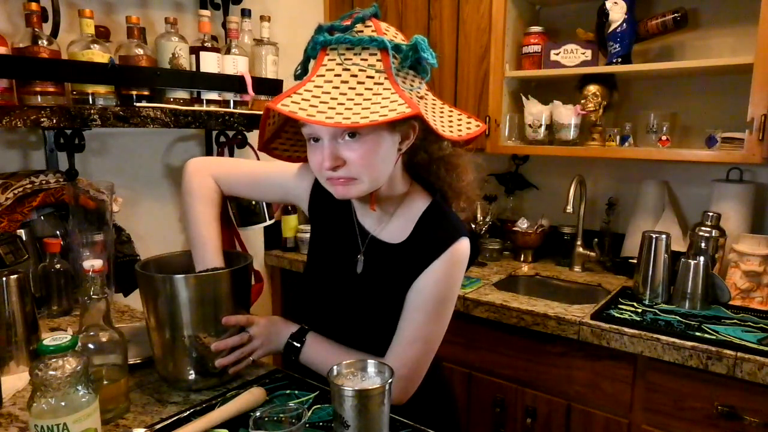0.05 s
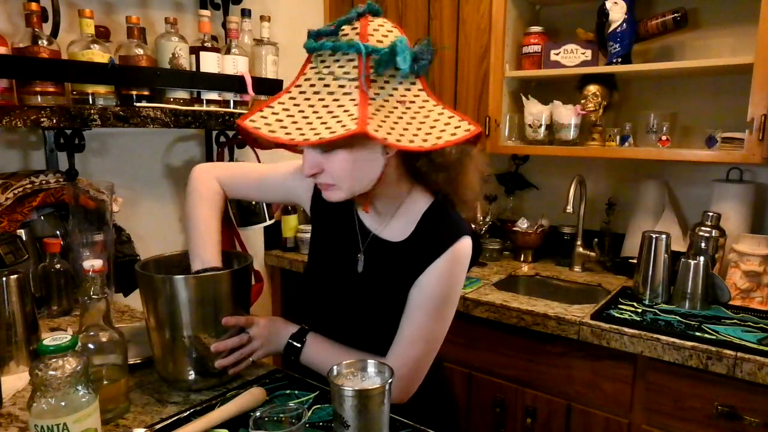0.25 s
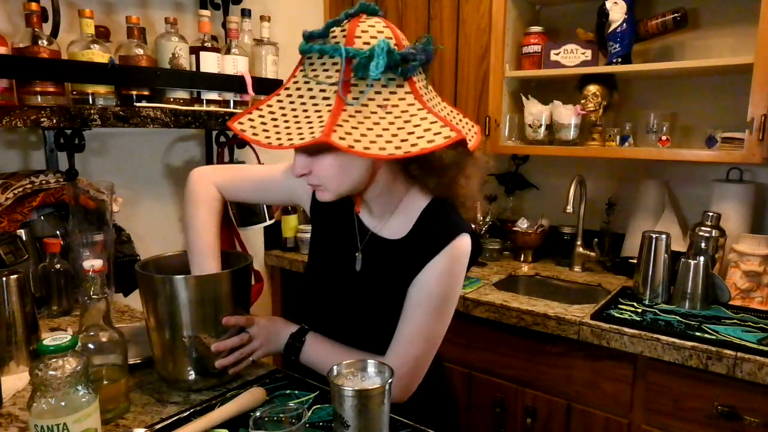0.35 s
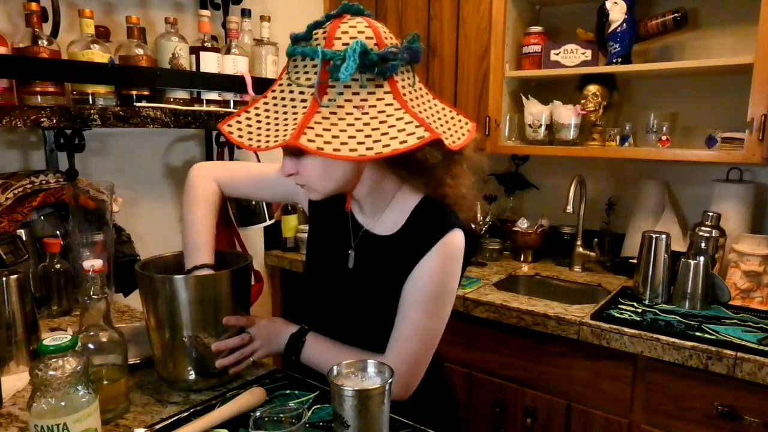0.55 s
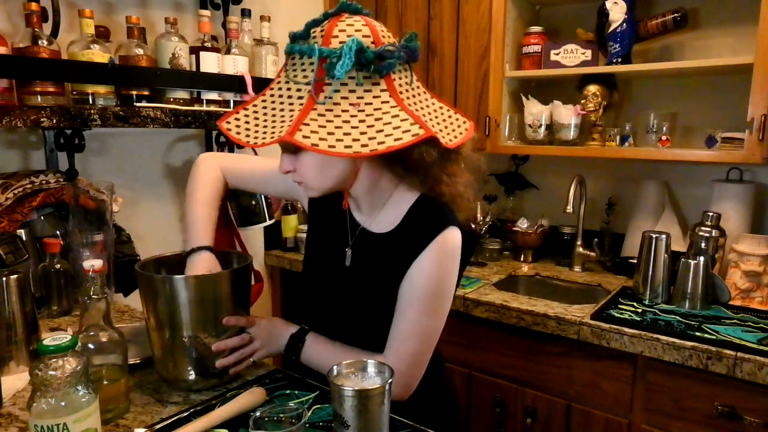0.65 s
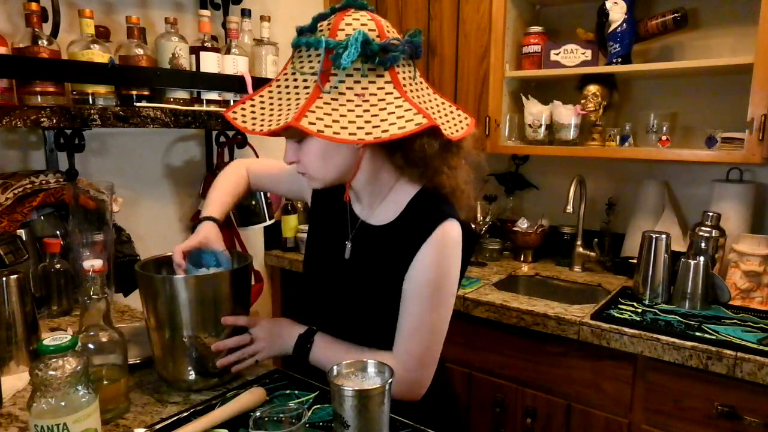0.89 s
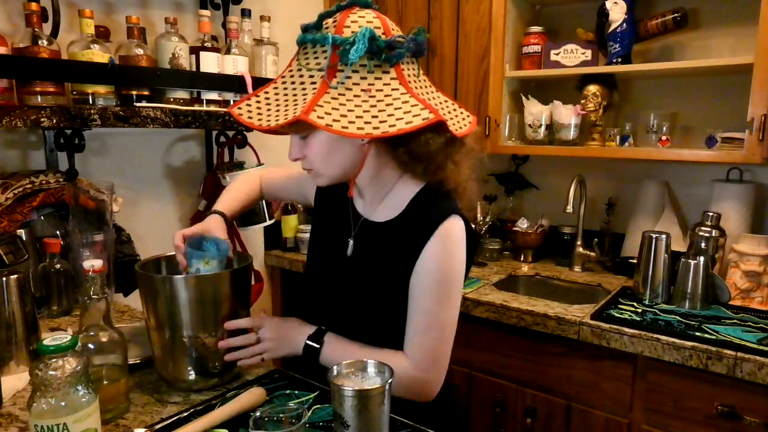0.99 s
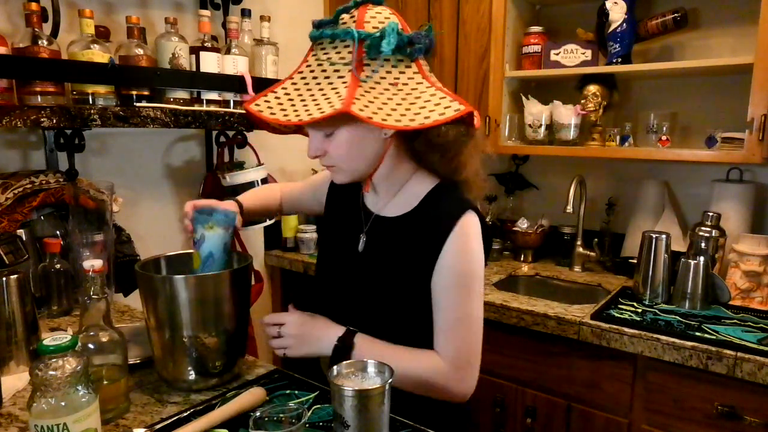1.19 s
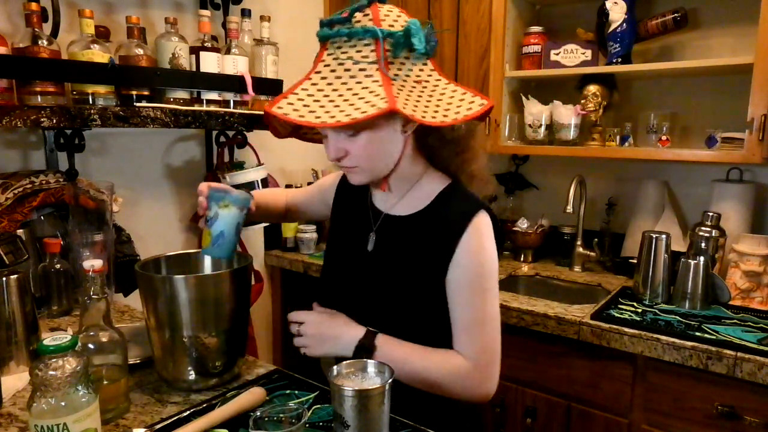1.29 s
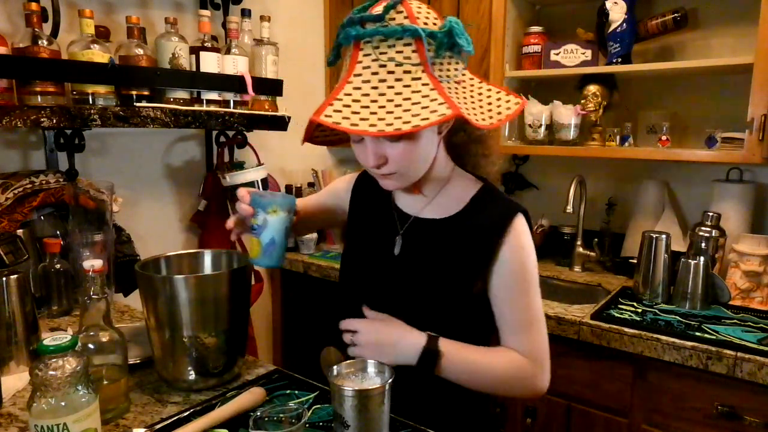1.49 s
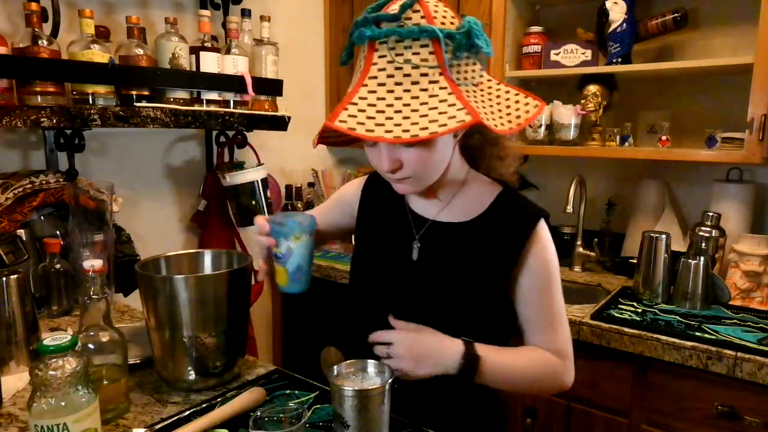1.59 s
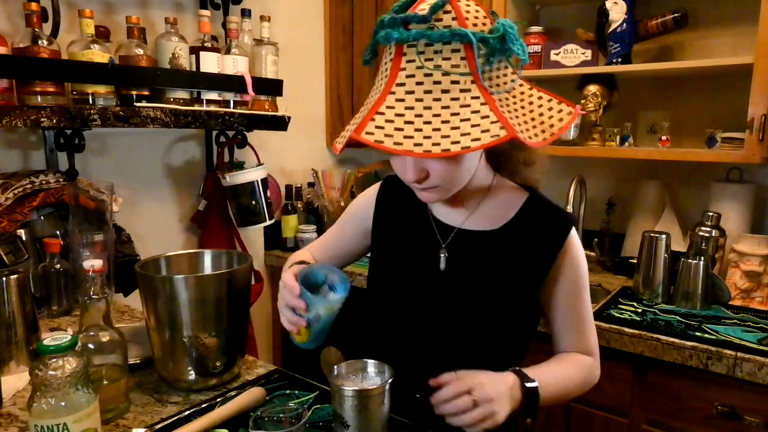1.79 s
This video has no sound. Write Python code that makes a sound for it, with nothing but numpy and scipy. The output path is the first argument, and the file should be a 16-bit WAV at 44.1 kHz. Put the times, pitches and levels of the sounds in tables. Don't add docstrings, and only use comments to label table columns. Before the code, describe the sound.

Ice scoop in a metal bucket, close and mono. Faint touches and a small bite before 0.15 s, then a pause. At about 0.22 s the cup plunges in, crunching with cracks and a strong hollow thud near 0.3; hard shoves continue to 0.65. A short scrape up the wall around 0.7, loose lumps clatter at 0.87-1.1, then quiet kitchen air, low hum and a faint late rustle near 1.6.

```python
import sys
import numpy as np
from scipy import signal
from scipy.fft import rfft, irfft, next_fast_len
from scipy.io import wavfile
from scipy.ndimage import uniform_filter1d

SR = 44100
rng = np.random.default_rng(int(sys.argv[2]) if len(sys.argv) > 2 else 0)


def ratio_of_db(decibels):
    return 10 ** (np.asarray(decibels, float) / 20)


def master_out(mix):
    frames = np.transpose(np.atleast_2d(mix))
    ceiling = np.clip(frames, -1, 1)
    pcm = np.round(ceiling * 32767).astype(np.int16)
    wavfile.write(sys.argv[1], SR, pcm)


N = 81585
T = np.arange(N) / SR

# (frequency [Hz], level [dB])
HUM = [(59.2, -80), (118.4, -83), (177.6, -76.5), (301.5, -87)]
# (frequency [Hz], density [dB per Hz])
AIR = [(25, -43), (55, -11), (129, -12), (180, 2), (222, -5), (303, -1), (1380, -7.5), (4000, -8.5),
       (15800, -18.5)]

# (time [s], effort [dB], cavity share [dB], high when the cup is deep)
TOUCH = [
    (0.0, -56, 21.5),
    (0.004, -52, -5),
    (0.048, -51.5, 5.5),
    (0.054, -45, -6.5),
    (0.066, -48.5, 2),
    (0.074, -34, 7.5),
    (0.146, -78, 4),
    (0.2, -63, -16),
]
DIG = [
    (0.205, -56, -1.5),
    (0.233, -21.5, 8),
    (0.267, -28.5, -5.1),
    (0.279, -28, -1.2),
    (0.297, -25.5, -4.8),
    (0.349, -22, 0.3),
    (0.43, -32, -1.5),
]
SHOVE = [
    (0.435, -33, 2),
    (.449, -28, -1),
    (0.473, -18.5, -1),
    (0.501, -36, 6),
    (0.539, -26, -1.5),
    (0.583, -35.5, 4),
    (0.595, -26.5, -0.5),
    (0.7, -44.5, -12),
]
LIFT = [
    (0.705, -39.5, -38),
    (0.719, -38.5, -35),
    (0.757, -39.5, -17),
    (0.789, -47, 9),
    (0.799, -41, -22),
    (.825, -43, -15),
    (0.868, -39, 0),
]
TUMBLE = [
    (0.873, -39.5, -4),
    (0.943, -38.5, -37),
    (0.951, -33.5, -8),
    (1.005, -26.5, -28.5),
    (1.085, -64, -30),
    (1.095, -43.5, -37),
    (1.111, -63, -11),
    (1.2, -74, -16),
]
# (frequency [Hz], density [dB per Hz])
ICE = [(350, -33), (600, -13), (850, -16), (1560, 3.5), (2080, -5), (2460, -1.5), (4190, -1.5),
       (9520, -7.5), (15800, -30)]
SIZE_EDGES_HZ = [0, 1300, 2400, 3600, 5400, 8000, 11500, 22050]
# (frequency [Hz], level [dB], t60 [s])
WALL = [(977, 4.5, 0.022), (1121.6, 1, 0.043), (1276, 3, 0.036), (1554, -8, 0.031), (1687, -2, 0.0484),
        (2040, -0.5, 0.018), (2800, 0.5, 0.03), (2670, -21, 0.066), (3092, -3.5, 0.091),
        (3383, -21.5, 0.03), (4160, -4.5, 0.061), (4284, 5, 0.05), (5100, -14, 0.04), (6700, -10, 0.04)]
# (frequency [Hz], level [dB], t60 [s])
LOOSE = [(716, 4, 0.021), (1295, 4.5, 0.015), (1600, -24.5, 0.024), (2084, -1.5, 0.033),
         (2270, -27.5, .015), (2930, -8, 0.034), (4200, -4.5, 0.0083)]
# (frequency [Hz], level [dB], t60 [s])
CAVITY = [(381, -18, 0.023), (427, -2, 0.12), (450.5, -8.5, 0.03), (530.3, 2, 0.081), (549.5, 2.5, 0.073),
          (670, 0, 0.04), (790, -6.5, 0.03), (880, -12.5, 0.024)]

# (time [s], peak [dB], pitch [Hz])
CRACKS = [(0.0702, -30, 1600), (0.221, -26, 1630), (0.2309, -15.5, 4350), (0.3077, -14.5, 1530),
          (0.4673, -15, 4060), (0.5297, -20, 2720), (0.595, -18.5, 1770), (0.6305, -22, 4200),
          (0.7558, -29, 1600), (0.7974, -27, 2270), (0.8745, -23, 1750), (0.8844, -21, 2250),
          (0.8945, -19, 1980), (0.9522, -20, 4170), (0.9729, -24, 1740), (0.9871, -49, 1600),
          (1.0076, -33, 1242), (1.3483, -49.5, 3940), (.079, -41, 990), (.089, -36, 1030),
          (.279, -15, 6300), (.8755, -18, 4160), (.893, -31, 3200), (.904, -24.5, 3260),
          (.548, -25.5, 4250), (.556, -21, 6300), (1.094, -37.5, 2880)]
# (time [s], peak [dB], pitch [Hz])
CHIPS = [(0.0054, -45, 5900), (0.0273, -43.5, 7200), (0.0528, -51, 5004), (0.0746, -34, 9000),
         (.0555, -47, 4216), (.0695, -42, 9000), (0.2314, -14, 7800), (0.2768, -15, 6400),
         (0.8435, -29.5, 7700), (0.8684, -34, 8300), (1.3475, -57, 2785), (1.35, -51.5, 6450),
         (.797, -43.5, 9000), (1.101, -30.5, 7000)]
# (time [s], peak [dB], pitch [Hz])
KNOCKS = [
    (.8748, -13, 1800),
    (.8935, -18, 2100),
    (.9525, -24, 2900),
    (.9735, -22, 2600),
    (.988, -19, 1700),
    (1.0928, -29, 7400),
    (1.0945, -28, 8200),
    (1.0975, -31, 7400),
]
# (time [s], peak [dB], pitch [Hz])
MORE_KNOCKS = [(.8752, -20, 6500), (.8752, -24, 8300), (.8752, -22, 2800), (.8754, -21, 3900), (.879, -28, 5800),
               (.909, -29, 7300), (.9125, -33, 8000), (.9648, -27, 8000), (.9655, -26, 2500), (.9737, -28, 6800),
               (.9795, -25, 1700), (.9795, -30, 10000), (.988, -24, 9500), (.9885, -28, 6500), (.992, -27, 6500),
               (1.0043, -27, 8500), (1.0078, -26, 8000), (1.0185, -31, 9500), (1.0762, -36, 7200),
               (.0778, -29, 1000), (.0533, -38, 7000), (.0535, -39, 3000), (.3075, -18, 1600), (.8935, -25, 3300)]
# (time [s], peak [dB], pitch [Hz], t60 [s])
THUDS = [(.062, -29, 430, 0.022), (.075, -32, 530, 0.022), (.077, -30, 330, 0.021),
         (.2185, -13.5, 481, 0.02), (.234, -26, 524, 0.025), (.250, -28, 550, 0.038),
         (0.3051, 0.5, 385, 0.029), (0.3065, -2, 529, 0.012), (.315, -18, 479, 0.016),
         (.3205, -10.5, 480, 0.02), (.331, -14, 442, 0.045), (0.341, -17, 483, .04),
         (.383, -11, 510, 0.011), (0.439, -17, 517, 0.058), (.453, -11, 520, 0.034),
         (.469, -11, 535.5, 0.071), (.518, -24, 514, 0.021), (.606, -22, 423.6, 0.13),
         (.628, -27.5, 410, 0.098), (.645, -33, 402, 0.075), (.775, -31.5, 447, 0.024),
         (.874, -46, 650, 0.031)]
# (frequency [Hz], level [dB], t60 [s])
SCRAPE = [(2494, -2, 0.12), (2730, -3.5, 0.057), (6300, -11, 0.018)]

AIR_DB, RUSTLE_S, RUSTLE_LEN_S, RUSTLE_DB = -65.5, 1.47, 0.33, 2.5
CUP_OUT_S, CUP_OUT_FADE_S = 0.8, 0.06
GRAINS_PER_S, GRAIN_SPREAD_DB, CLUMP_DB, CLUMPS_PER_S = 6000, 3, 1.96, 70
ICE_DB, WALL_DB, LOOSE_DB, CAVITY_DB = -3.5, -11.5, -15, -5
SPARKLE_HZ, SPARKLE_DB_PER_DB, SPARKLE_AT_DB = 7000, -0.0469, -33
PATCHY_DB, PATCHES_PER_S = 3, 35
COUNTER_DB, COUNTER_LAG_S = -37, 0.05
CRACK_S, CRACK_CYCLES, CRACK_DB = 0.009, 33.36, -4.5
CHIP_S, CHIP_CYCLES, CHIP_DB = 0.0035, 6.3, 2
KNOCK_S, KNOCK_CYCLES = 0.0012, 9
SNAP_EDGE, SNAP_FLOOR, KICK_DB = 1.98, 0.72, -25
THUD_PUSH_S, THUD_DB, THUD_CAVITY_DB = 0.005057, -4, -18
SCRAPE_S, SCRAPE_LEN_S, SCRAPE_DB = 0.674, 0.102, -39.5
SCRAPE_PER_S, SCRAPE_JITTER, SCRAPE_SPREAD_DB = 310, 0.2, 3
MOUTH_HZ, LEAK_DB = 313, -54
ROOM_T60_S, ROOM_DB, ROOM_TOP_HZ, ROOM_GAP_S = 0.28, -10, 9000, 0.00075


def unit(x):
    return x / np.sqrt(np.mean(x ** 2) + 1e-30)


def ring(x, modes):
    out = 0
    for hz, db, t60_s in modes:
        r = np.exp(-np.log(1000) / (max(t60_s, 1 / 2000) * SR))
        w = 2 * np.pi * hz / SR
        out = out + ratio_of_db(db) * signal.lfilter([0, np.sin(w)], [1, -2 * r * np.cos(w), r * r], x)
    return out


def colour(x, points):
    p, n = np.array(points), next_fast_len(len(x))
    hz = np.maximum(np.arange(n // 2 + 1) * SR / n, 1)
    gain = ratio_of_db(np.interp(np.log(hz), np.log(p[:, 0]), p[:, 1]))
    return irfft(rfft(x, n) * gain, n)[:len(x)]


def walk(rate_hz):
    hold = int(SR / rate_hz)
    steps = rng.standard_normal(N)[np.arange(N) // hold]
    return unit(uniform_filter1d(steps, hold // 2))


def kitchen():
    rustle = np.sin(np.pi * np.clip((T - RUSTLE_S) / RUSTLE_LEN_S, 0, 1))
    level_db = AIR_DB + RUSTLE_DB * rustle + 0.6 * walk(22)
    out = ratio_of_db(level_db) * unit(colour(rng.standard_normal(N), AIR))
    for k, (hz, db) in enumerate(HUM):
        out = out + np.sqrt(2) * ratio_of_db(db + 1.5 * walk(2.1)) * np.sin(2 * np.pi * hz * T + k)
    return out


def digging():
    path = list(TOUCH) + list(DIG) + list(SHOVE) + list(LIFT) + list(TUMBLE) + [(1.25, -100, -31)]
    s, effort_db, deep_db = np.array(path).T
    return np.interp(T, s, effort_db), ratio_of_db(np.interp(T, s, deep_db))


def grains():
    spectrum, f = 0, np.arange(N // 2 + 1) * SR / N
    for lo, hi in zip(SIZE_EDGES_HZ[:-1], SIZE_EDGES_HZ[1:]):
        chance, side, size = rng.random((3, N))
        strength = ratio_of_db(-GRAIN_SPREAD_DB * np.log(size + 0.004))
        hits = (chance < GRAINS_PER_S / SR) * np.sign(side - 0.5) * strength
        clumped = hits * ratio_of_db(CLUMP_DB * walk(CLUMPS_PER_S))
        spectrum = spectrum + rfft(clumped) * ((f >= lo) & (f < hi))
    return unit(irfft(spectrum, N))


def patchy(x, modes):
    return sum(ring(x * ratio_of_db(PATCHY_DB * walk(PATCHES_PER_S)), [mode]) for mode in modes)


def crunch(effort_db, deep):
    effort = ratio_of_db(effort_db)
    cup_out = np.clip((T - CUP_OUT_S) / CUP_OUT_FADE_S, 0, 1)
    g = grains()
    top = signal.lfilter(*signal.butter(2, SPARKLE_HZ, "high", fs=SR), g)
    sparkle = ratio_of_db(SPARKLE_DB_PER_DB * (effort_db - SPARKLE_AT_DB))
    ice = g + top * (sparkle - 1)
    direct = colour(ice * effort, ICE) * ratio_of_db(ICE_DB) / np.std(colour(g, ICE))
    wall = patchy(g * effort * (1 - cup_out), WALL) * ratio_of_db(WALL_DB) / np.std(ring(g, WALL))
    rim = patchy(g * effort * cup_out, LOOSE) * ratio_of_db(LOOSE_DB) / np.std(ring(g, LOOSE))
    cavity = ring(g * effort * deep, CAVITY) * ratio_of_db(CAVITY_DB) / np.std(ring(g, CAVITY))
    return direct + wall + rim + cavity


def counter_rock(effort_db, deep):
    band = signal.butter(3, (75.1, 200), "band", fs=SR)
    rumble = unit(signal.lfilter(*band, rng.standard_normal(N)))
    push = uniform_filter1d(ratio_of_db(effort_db) * deep, size=3000)
    return rumble * np.roll(push, int(COUNTER_LAG_S * SR)) * ratio_of_db(COUNTER_DB)


def snaps(table, burst_s, cycles):
    out, n = np.zeros(N + 2048), np.arange(2048)
    edge = SNAP_EDGE * np.sqrt(burst_s * SR / 10) * (n == 0)
    for (s, db, hz), z in zip(table, rng.standard_normal((len(table), 2048))):
        burst = z * np.exp(-n / (burst_s * SR)) + edge
        own = ring(ring(burst, [(hz, 0, 5 / hz)]), [(hz, 0, cycles / hz)])
        own = signal.lfilter(*signal.butter(4, SNAP_FLOOR * hz, "high", fs=SR), own)
        start = int(s * SR)
        out[start:start + 2048] += ratio_of_db(db) * own / np.abs(own).max()
    return out[:N]


def cracks():
    kick = np.zeros(N)
    for s, db, hz in CRACKS:
        kick[int(s * SR)] = ratio_of_db(db + KICK_DB)
    inside = T < CUP_OUT_S
    lumps = ratio_of_db(CRACK_DB) * snaps(CRACKS, CRACK_S, CRACK_CYCLES)
    chips = ratio_of_db(CHIP_DB) * snaps(CHIPS, CHIP_S, CHIP_CYCLES)
    loose = snaps(list(KNOCKS) + list(MORE_KNOCKS), KNOCK_S, KNOCK_CYCLES)
    return lumps + chips + loose + ring(kick * inside, WALL) + ring(kick * ~inside, LOOSE)


def thuds():
    out, kick, u = 0, np.zeros(N), np.arange(int(THUD_PUSH_S * SR))
    for s, db, hz, t60_s in THUDS:
        push = np.zeros(N)
        push[int(s * SR) + u] = ratio_of_db(db + THUD_DB) * np.sin(2 * np.pi * hz * u / SR) * 2 / len(u)
        out = out + ring(push, [(hz, 0, t60_s)])
        kick = kick + push
    return out + ratio_of_db(THUD_CAVITY_DB) * ring(kick, CAVITY)


def scrape():
    phase = np.cumsum(SCRAPE_PER_S * (1 + SCRAPE_JITTER * walk(200))) / SR
    ticks = np.diff(np.floor(phase), prepend=0) * ratio_of_db(SCRAPE_SPREAD_DB * rng.standard_normal(N))
    stroke = np.sin(np.pi * np.clip((T - SCRAPE_S) / SCRAPE_LEN_S, 0, 1))
    return ratio_of_db(SCRAPE_DB) * ring(ticks * stroke, SCRAPE) / np.std(ring(ticks, SCRAPE))


def mouth(x):
    high = signal.butter(5, MOUTH_HZ, "high", fs=SR, output="sos")
    return signal.sosfilt(high, x) + ratio_of_db(LEAK_DB) * x


def room(x):
    t = T[:SR // 2]
    tail = rng.standard_normal(len(t)) * np.exp(-np.log(1000) * t / ROOM_T60_S) * (t > ROOM_GAP_S)
    tail = signal.lfilter(*signal.butter(1, ROOM_TOP_HZ, fs=SR), tail)
    return ratio_of_db(ROOM_DB) * signal.fftconvolve(x, tail / np.sqrt(np.sum(tail ** 2)))[:N]


def scene():
    floor = kitchen()
    effort_db, deep = digging()
    bucket = mouth(crunch(effort_db, deep) + cracks() + thuds() + scrape())
    return (bucket + room(bucket) + counter_rock(effort_db, deep) + floor)[None]


def top_cut(x):
    return signal.sosfilt(signal.butter(12, 15970, fs=SR, output="sos"), x)


def record(dry):
    return top_cut(dry)


dry = scene()
out = record(dry)
master_out(out)
```